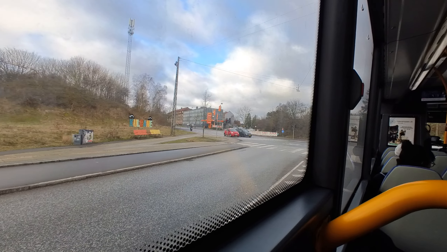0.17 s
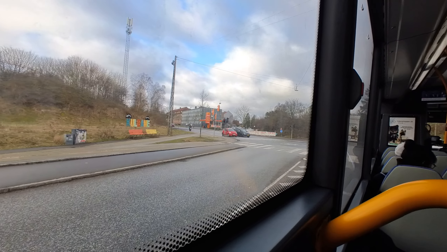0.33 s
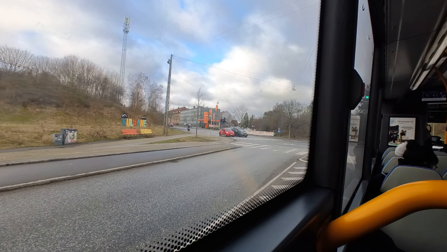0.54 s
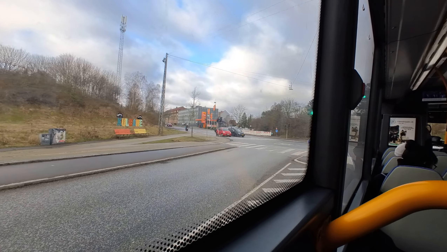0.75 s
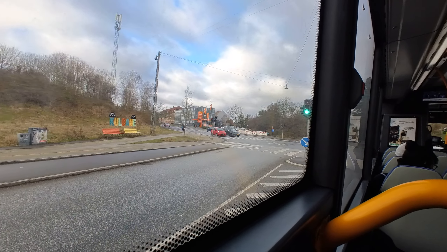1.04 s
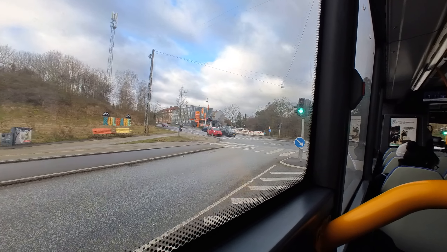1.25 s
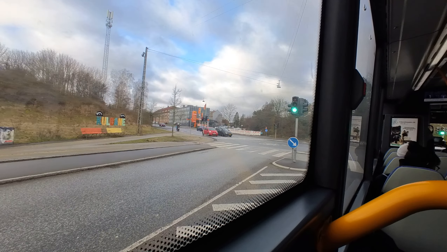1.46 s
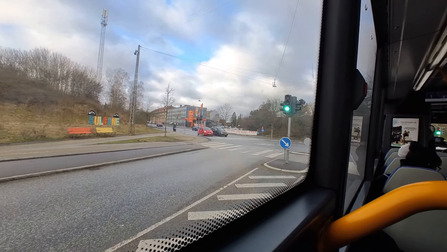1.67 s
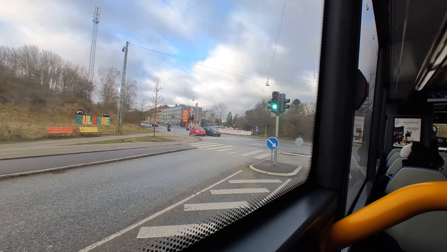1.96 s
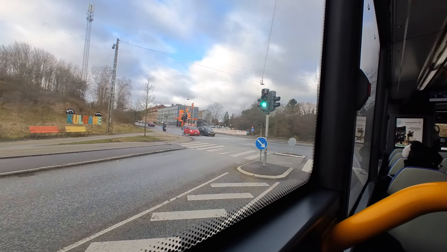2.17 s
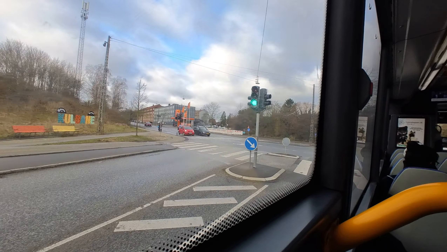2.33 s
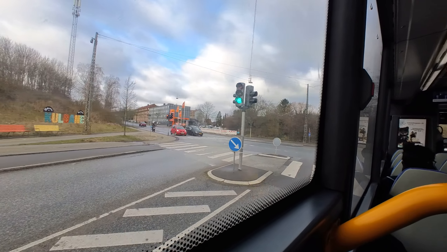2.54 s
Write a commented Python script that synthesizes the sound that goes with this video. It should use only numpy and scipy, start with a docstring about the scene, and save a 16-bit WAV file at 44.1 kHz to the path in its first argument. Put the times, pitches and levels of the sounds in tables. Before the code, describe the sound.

Heard in stereo from inside a bus: deep idling engine, soft fan hum and road noise, a sharp jolt with creaking trim, then the motor takes load and steadily rises while loose panels rattle.

```python
"""Inside a city bus pulling away. The diesel idles over road roar, air hiss and a fan hum; early bumps ring as
decaying sines, panels rattle in shaped noise bursts and trim squeaks in short glides. From about 1.1 s the engine
takes load and climbs: its boom is sines at multiples of the cycle rate, its gear whine sines at a geared multiple.
More thuds, rattles and squeaks follow; a faint noise buzz of loose trim comes and goes, and near the end
the fan fades and the buzz drops."""
import sys
import numpy as np
from scipy import signal
from scipy.fft import rfft, irfft, next_fast_len
from scipy.io import wavfile
from scipy.ndimage import uniform_filter1d, map_coordinates

SR = 44100
rng = np.random.default_rng(int(sys.argv[2]) if len(sys.argv) > 2 else 0)


def generate_wav(sig):
    """Save sig (samples, or channels by samples) to the path in sys.argv[1] as 16-bit PCM at SR."""
    pcm = np.round(np.clip(np.atleast_2d(sig).T, -1, 1) * 32767).astype(np.int16)
    wavfile.write(sys.argv[1], SR, pcm)


N = 119070  # 2.7 s

# Road roar and air hiss before gain: freq_hz, density_db_per_hz
ROAR_SPECTRUM = [(15, -57.5), (30, -48.5), (60, -52.5), (100, -51.5), (150, -53), (220, -54.5), (300, -55),
                 (400, -60), (520, -63.5), (650, -65), (850, -68), (1000, -77), (1300, -81.5), (2000, -100),
                 (4000, -140)]
HISS_SPECTRUM = [(400, -100), (900, -83.5), (1300, -76), (2000, -77.5), (2600, -80), (3100, -88),
                 (3700, -93.5), (4300, -95), (4900, -88.5), (5600, -96), (6600, -99), (8000, -104),
                 (9200, -112), (11000, -119), (13000, -126), (15500, -140)]
# Road and air course: time_s, roar_gain_db, hiss_gain_db
ROAD_GAINS = [(0, 0, 4), (.25, 3, 1), (.45, 0, 2.5), (.7, 1.5, 0.5), (1, 1, 1), (1.4, 1.5, 2), (1.7, 1, 3),
              (1.9, 0.5, 3.5), (2.1, 1, 3), (2.3, 2, 3), (2.5, 2, 3.5), (2.7, 1, 5)]
# Fan hum course: time_s, level_db (rms)
FAN_LEVEL = [(0, -35.5), (1.1, -36.5), (1.6, -35), (2.05, -39), (2.3, -55)]
FAN_HZ = 366
# Loose trim buzz before gain: freq_hz, density_db_per_hz
BUZZ_SPECTRUM = [(3000, -120), (5000, -96), (7500, -102), (9300, -113), (11000, -110), (13000, -120),
                 (15500, -128)]
# Buzz course: time_s, gain_db
BUZZ_GAIN = [(0, -3), (.25, -6.5), (.45, 2.5), (.7, -18), (1.1, 0.5), (1.2, 0), (1.35, 0.5), (1.45, -1.5),
             (1.7, 0), (1.9, 3), (2.05, 6.5), (2.17, -0.5), (2.3, 5.5), (2.5, -17), (2.7, -17.5)]
# Creaks, squeaks and ticks of the trim: middle_s, length_s, start_hz, end_hz, peak_db (before flutter and pan)
TRIM_SQUEAKS = [(0.148, 0.0087, 2400, 2440, -29), (.153, 0.0077, 5000, 5000, -32),
                (.154, 0.017, 2880, 2900, -29), (0.27, 0.069, 794, 734, -33), (.31, 0.056, 484, 545, -28.5),
                (0.359, 0.045, 516, 540, -24), (0.434, 0.1, 383, 440, -32.5), (0.367, 0.049, 273, 327, -25),
                (0.564, 0.18, 907, 900, -43.5), (1.797, 0.018, 1650, 1710, -39),
                (1.804, 0.023, 2090, 2150, -38), (1.816, 0.019, 2400, 3330, -40.5),
                (0.366, 0.02, 1720, 1690, -33), (2.321, 0.026, 2200, 2470, -38.5)]
# Panel rattles: peak_s, gain_db, brightness_db_per_octave, rise_s, t60_s, left_over_right_db
PANEL_RATTLES = [(.03, 0, 1, 0.025, 0.15, 0), (.148, 15.5, -4, 0.002, 0.1, 2.5),
                 (.166, 10, -4, 0.008, 0.26, -2.5), (0.316, -1, 7, .006, 0.15, -1),
                 (.325, 4, -6, .025, .2, 0), (.353, 4.5, 1, 0.012, 0.2, 3), (.368, 7, -1, 0.006, 0.2, 4.5),
                 (.402, 3, -8, 0.006, 0.3, -1.5), (1.108, -6.5, 4.5, 0.013, .15, 2),
                 (1.282, 5, 2, 0.015, 0.22, 0.5), (1.333, -6, 3, .01, 0.22, -6),
                 (1.515, 5, 1.5, 0.0089, 0.3, 0), (1.548, 2, -1.5, 0.0071, .12, 3),
                 (1.59, 6, 2, 0.03, 0.17, 0), (1.8, -3, -2, .01, 0.22, 0), (2.009, -2, 3, 0.027, 0.62, 1),
                 (2.3, -6.5, 1.5, 0.04, 0.45, 0.5), (2.42, -7.5, 8.5, .001, .02, 6.5)]
# Panel noise at gain 0 and brightness 0: freq_hz, density_db_per_hz
PANEL_SPECTRUM = [(100, -150), (300, -96), (700, -76.5), (1200, -82), (2000, -76), (2800, -80),
                  (3600, -85.5), (4900, -83.5), (6000, -87), (8000, -92), (9500, -103), (11000, -105),
                  (13000, -112), (15500, -126)]
PIVOT_HZ = 3000  # brightness tilts about this
CHATTER_PER_S, CHATTER_DB = 260, 2  # a rattle is many small contacts
# Floor and panel thuds: start_s, pitch_hz, level_db (before rise and decay), rise_s, t60_s
FLOOR_THUDS = [(.19, 37, -1, .035, .24), (.15, 365, -10, .014, .12), (.15, 232, -12, .014, .13),
               (.135, 72, -6, .02, .25), (.155, 480, -16, .012, .12), (.375, 335, -13, .014, .15),
               (1.28, 95, -10, .015, .15), (.77, 250, -18, .012, .15), (1.29, 520, -22, .01, .1)]
# Engine course: time_s, cycles_per_s (one cycle is two crank turns), load_0_to_1
ENGINE_COURSE = [(0, 8.25, 0), (.6, 8.28, 0), (.9, 8.15, 0), (1.05, 8.3, 0), (1.2, 8.63, .35),
                 (1.35, 9, .65), (1.5, 9.35, 1), (1.65, 9.73, 1), (1.8, 9.95, 1), (1.95, 10.15, 1),
                 (2.1, 10.23, 1), (2.25, 10.38, 1), (2.4, 10.56, 1), (2.55, 10.68, 1), (2.7, 10.75, 1)]
# Engine orders before cabin gain: multiple_of_cycle_rate, idle_db, loaded_db (rms)
ENGINE_ORDERS = [(4, -46, -41), (5, -51, -30), (6, -18, -23), (7, -44, -39), (8, -38, -46), (9, -38, -34),
                 (10, -41, -31), (11, -50, -42), (12, -40, -29), (13, -48, -35), (14, -42, -29),
                 (15, -43, -27), (16, -28, -34), (17, -37, -29), (18, -29, -35), (19, -44, -39),
                 (20, -42, -36), (21, -37, -34), (23, -37, -41), (24, -42, -34), (27, -44, -33),
                 (28, -41, -40), (32, -45, -43), (36, -38, -37), (38, -48, -37), (39, -46, -36),
                 (42, -48, -38), (50, -41, -40), (60, -41, -44)]
# Cabin boom: freq_hz, gain_db
CABIN_GAIN = [(20, -3), (30, -2), (40, 9), (50, -10), (60, -12), (70, 2), (80, 6), (90, 9), (96, 10),
              (104, 1), (114, 7), (124, 2), (130, -5), (140, -1), (150, -3), (160, -3), (180, -2),
              (190, -3), (200, -1), (230, -9), (260, -3), (290, -5), (320, -9), (350, -10), (380, -6),
              (440, -11)]
ORDER_WANDER_DB, ORDER_DRIFT_RAD = 2, 0.7
# Gear whine: time_s, third_mesh_multiple_db, fourth_mesh_multiple_db (rms)
WHINE_LEVELS = [(0, -69, -57.5), (.55, -55, -52), (.92, -65.5, -66), (1.15, -68, -46), (1.23, -66, -61),
                (1.3, -60.5, -47.5), (1.5, -74, -52.5), (1.62, -64, -66), (2.1, -62, -55), (2.35, -67, -62),
                (2.6, -51, -50.5)]
MESH_MULTIPLE = 36.2  # of the cycle rate
MESH_WAVER, WHINE_PATCHY_DB = .009, 3.5  # share of pitch, dB
# Left-right likeness of the noises: freq_hz, correlation
STEREO_LIKENESS = [(100, 0.97), (250, 0.98), (500, 0.95), (1000, 0.88), (2000, 0.55), (4000, .05),
                   (8000, 0.079), (12000, 0.61)]
# Channel balance: freq_hz, left_over_right_db
CHANNEL_BALANCE = [(60, 0), (250, .2), (500, .4), (2000, .9), (4000, -.8), (8000, .5)]
BASS_HZ, TOP_HZ = 25, 15700  # band edges


def amp(db):
    """Amplitude factor of a level in dB."""
    return 10 ** (np.asarray(db) / 20)


def along(points, hz):
    """Interpolate (freq_hz, value) points on a log frequency axis."""
    point_hz, value = np.transpose(points)
    return np.interp(np.log(hz + 1), np.log(point_hz + 1), value)


def curves(rows):
    """One value per sample for each column after the time."""
    time_s, *columns = np.transpose(rows)
    return [np.interp(np.arange(N) / SR, time_s, column) for column in columns]


def wobble(knots_per_s, count=N):
    """Smooth random curve: a spline through unit-variance knots."""
    knots = rng.standard_normal(int(count / SR * 1000) + 4)
    return map_coordinates(knots, [np.arange(count) * min(knots_per_s, 999) / SR])


def filtered(x, response):
    """Multiply the spectrum of x by a response of frequency."""
    size = next_fast_len(x.shape[-1] + 8192)
    spectrum = rfft(x, size) * response(np.fft.rfftfreq(size, 1 / SR))
    return irfft(spectrum, size)[..., :x.shape[-1]]


def coloured(pair, density, tilt_db=0):
    """Shape two unrelated white noises to a density in dB per Hz and mix them to the left-right likeness."""
    def gain(hz):
        octaves = np.log2(np.maximum(hz, PIVOT_HZ / 2) / PIVOT_HZ)  # tilt is flat below half the pivot
        return amp(along(density, hz) + tilt_db * octaves) * np.sqrt(SR / 2)

    def mid_side(hz):
        angle = np.arccos(np.clip(along(STEREO_LIKENESS, hz), -1, 1)) / 2
        return gain(hz) * [np.cos(angle), np.sin(angle)]

    mid, side = filtered(pair, mid_side)
    return np.array([mid + side, mid - side])


def patchy(patchy_db):
    """Two white noises with shared time-frequency patches of random gain."""
    bins = signal.stft(rng.standard_normal((2, N)), nperseg=1024)[2]
    field = rng.standard_normal(bins.shape[1:])
    field = uniform_filter1d(field, size=8, axis=0)
    field = uniform_filter1d(field, size=5, axis=1)
    return signal.istft(bins * amp(patchy_db * field / field.std()), nperseg=1024)[1][:, :N]


def road():
    """Broadband road and air noise: a low roar and a higher hiss that flutters."""
    roar_db, hiss_db = curves(ROAD_GAINS)
    roar_db = roar_db + 0.49 * wobble(3.4)
    hiss_db = hiss_db + 0.77 * wobble(14) + 0.66 * wobble(200)
    roar = amp(roar_db) * coloured(patchy(patchy_db=1.5), ROAR_SPECTRUM)
    hiss = amp(hiss_db) * coloured(patchy(patchy_db=0.96), HISS_SPECTRUM)
    return roar + hiss


def fan():
    """A steady sine hum, wavering slightly in level and phase."""
    level_db = curves(FAN_LEVEL)[0] + 1.5 * wobble(14)
    phase = 2 * np.pi * FAN_HZ * np.arange(N) / SR + 0.3 * wobble(14)
    return np.sqrt(2) * amp(level_db) * np.sin(phase)


def buzz():
    """Loose trim buzzes as faint treble noise with slow and fast flutter."""
    gain_db = curves(BUZZ_GAIN)[0] + 1.4 * wobble(21) + 1.1 * wobble(300)
    return amp(gain_db) * coloured(patchy(patchy_db=2.5), BUZZ_SPECTRUM)


def squeaks():
    """Trim tones gliding linearly in pitch under a soft swell, with a rough edge, slightly left."""
    t, tones = np.arange(N) / SR, 0
    for middle_s, length_s, start_hz, end_hz, peak_db in TRIM_SQUEAKS:
        u = np.clip((t - middle_s) / length_s, -.5, .5)
        cycles = length_s * ((start_hz + end_hz) / 2 * u + (end_hz - start_hz) / 2 * u ** 2)
        tones = tones + amp(peak_db) * np.cos(np.pi * u) ** 2 * np.sin(2 * np.pi * cycles)
    return tones * amp(0.46 * wobble(150)) * amp([[.3], [-.3]])


def rattles():
    """Loose panels: noise bursts that swell fast, chatter and die away exponentially."""
    lead, span = SR // 10, SR // 2  # samples before the peak, in all
    out = np.zeros((2, N + span))
    t = (np.arange(span) - lead) / SR
    fade_out = np.cos(np.pi * t / t[-1] / 2)
    for peak_s, gain_db, bright_db, rise_s, t60_s, pan_db in PANEL_RATTLES:
        swell = np.exp(-(t / min(rise_s, lead / SR / 3)) ** 2)
        decay = amp(-60 * np.abs(t) / t60_s) * fade_out
        shape = np.where(t < 0, swell, decay)
        chatter = amp(CHATTER_DB * wobble(CHATTER_PER_S, count=span))
        pair = rng.standard_normal((2, span)) * shape * chatter
        channel_db = gain_db + np.array([[pan_db], [-pan_db]]) / 2
        burst = amp(channel_db) * coloured(pair, PANEL_SPECTRUM, bright_db)
        at = round(peak_s * SR)
        out[:, at:at + span] += burst[:, :N + span - at]
    return out[:, lead:lead + N]


def thuds():
    """Bumped floor and panel modes: soft-onset sines with exponential decay."""
    t, out = np.arange(N) / SR, 0
    for start_s, pitch_hz, level_db, rise_s, t60_s in FLOOR_THUDS:
        u = np.maximum(t - start_s, 0)
        onset = 1 - np.exp(-(u / rise_s) ** 2)
        out = out + amp(level_db - 60 * u / t60_s) * onset * np.sin(2 * np.pi * pitch_hz * u)
    return out


def gear_whine(cycles_per_s):
    """Gear teeth sound at the 3rd and 4th multiples of a mesh rate tied to engine speed."""
    mesh_hz = MESH_MULTIPLE * cycles_per_s * (1 + MESH_WAVER * wobble(12))
    phase = 2 * np.pi * np.cumsum(mesh_hz) / SR
    whine = 0
    for k, level_db in zip((3, 4), curves(WHINE_LEVELS)):
        whine = whine + amp(level_db + WHINE_PATCHY_DB * wobble(21.99)) * np.sin(k * phase)
    return np.sqrt(2) * whine


def engine_boom(cycles_per_s, load):
    """Firing orders: multiples of the cycle rate, weighted by load and cabin resonance."""
    phase = 2 * np.pi * np.cumsum(cycles_per_s) / SR
    boom = 0
    for k, idle_db, loaded_db in ENGINE_ORDERS:
        level_db = idle_db + load * (loaded_db - idle_db)
        level_db = level_db + along(CABIN_GAIN, k * cycles_per_s) + ORDER_WANDER_DB * wobble(4.12)
        offset = rng.uniform(0, 2 * np.pi) + ORDER_DRIFT_RAD * wobble(2.515)
        boom = boom + amp(level_db) * np.cos(k * phase + offset)
    return np.sqrt(2) * boom


def engine():
    """One speed curve drives both boom and gear whine; load sets the boom's balance."""
    cycles_per_s, load = curves(ENGINE_COURSE)
    return gear_whine(cycles_per_s) + engine_boom(cycles_per_s, load)


def scene():
    """Sum of all layers, background first."""
    return road() + fan() + buzz() + squeaks() + rattles() + thuds() + engine()


def record(dry):
    """Balance the channels by frequency, roll off deep bass and cut above TOP_HZ."""
    def response(hz):
        balance = amp(along(CHANNEL_BALANCE, hz) * [[.5], [-.5]])
        bass = 1 / np.sqrt(1 + (BASS_HZ / (hz + 1)) ** 4)
        return balance * bass * (hz < TOP_HZ)

    margin = SR // 10  # keeps filter edges out of the result
    wide = np.pad(dry, ((0, 0), (margin, margin)), "reflect", reflect_type="odd")
    return filtered(wide, response)[:, margin:-margin]


dry = scene()
out = record(dry)
generate_wav(out)
```